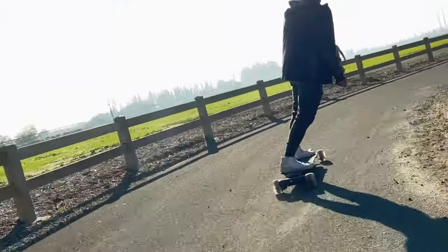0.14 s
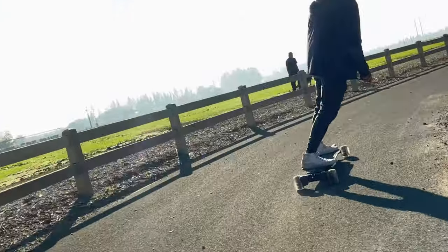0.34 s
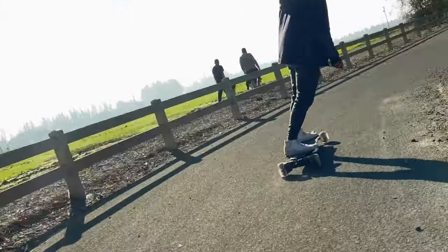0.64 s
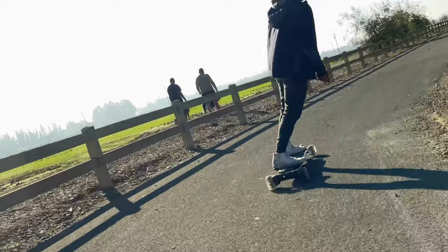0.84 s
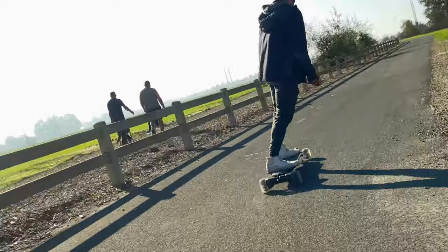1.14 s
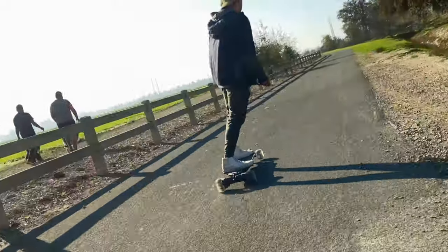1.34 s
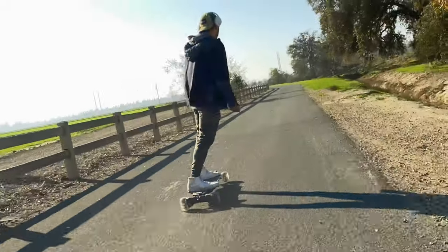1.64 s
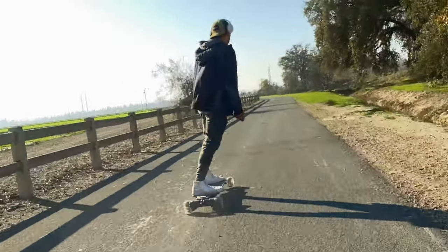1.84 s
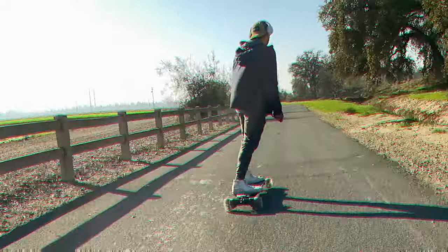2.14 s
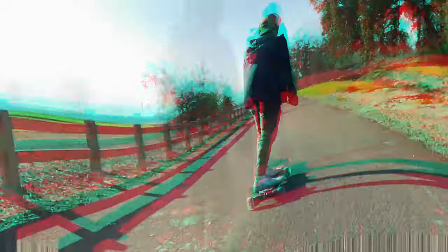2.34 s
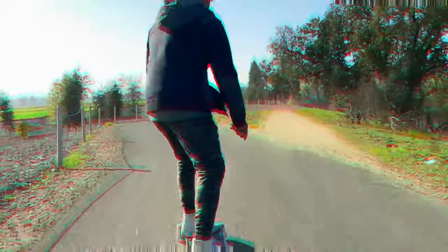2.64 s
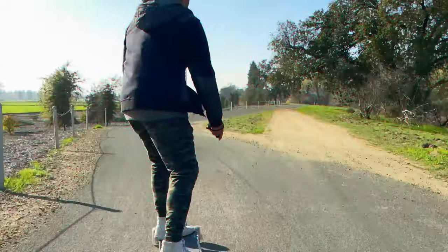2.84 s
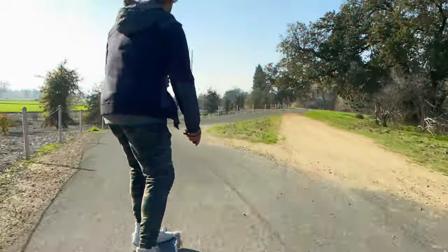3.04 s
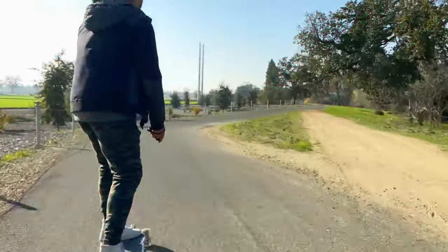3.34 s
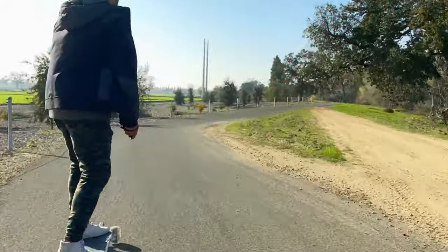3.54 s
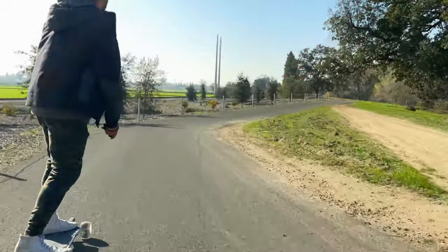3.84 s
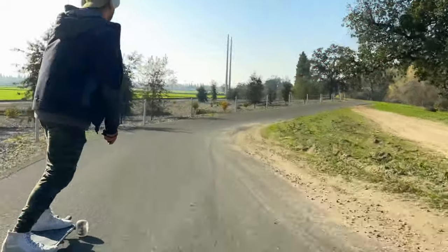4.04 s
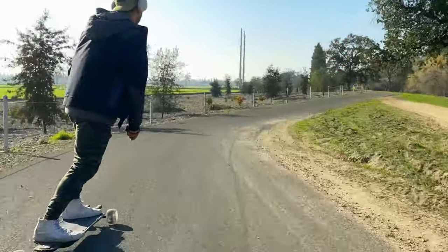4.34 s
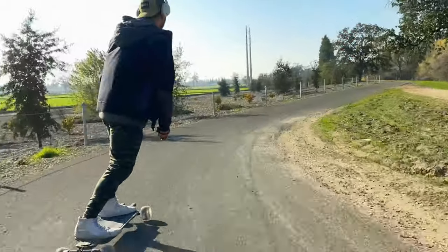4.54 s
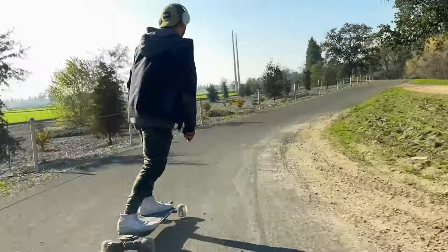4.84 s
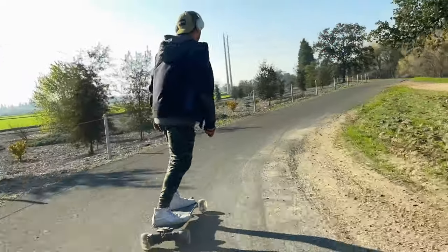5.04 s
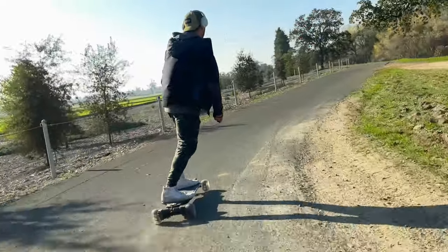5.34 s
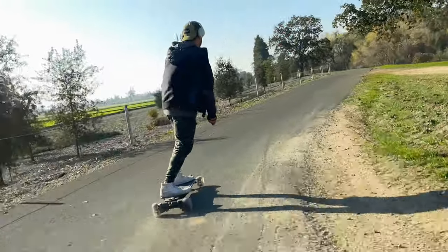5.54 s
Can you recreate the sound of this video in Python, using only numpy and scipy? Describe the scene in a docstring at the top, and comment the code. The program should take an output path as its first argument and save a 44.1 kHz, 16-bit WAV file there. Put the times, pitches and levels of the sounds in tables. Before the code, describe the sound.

A microphone follows an electric skateboard along a paved outdoor path, picking up rough wheel noise and low, gusty wind. Little stones click against the board and the wheels knock over bumps. The sound dips out briefly before the middle, then returns nearer, with stronger wind thumps. Toward the end two high motor whines swell, drift apart in pitch and come together again over the rolling.

```python
"""Wheels roar on coarse asphalt as an electric skateboard carves along, followed by a microphone.
The rough surface drives the resonances of wheels and deck; flicked grit snaps and small bumps knock.
Two hub motors whine almost in unison and part in pitch in a bend, where the inner one slows.
Turbulent wind buffets the microphone into its limiter.
About two seconds in, the sound fades out and comes back from closer by."""
import sys
import numpy as np
from scipy import signal
from scipy.fft import rfft, irfft
from scipy.io import wavfile
from scipy.ndimage import uniform_filter1d, minimum_filter1d

SR = 44100
rng = np.random.default_rng(int(sys.argv[2]) if len(sys.argv) > 2 else 0)


def put_to_file(sound):
    """Save the sound as 16-bit audio at rate SR, in the file named by the first command-line argument."""
    columns = np.atleast_2d(sound).T  # one column per channel
    safe = np.clip(columns, -1, 1)
    whole_steps = np.round(safe * 32767)
    wavfile.write(sys.argv[1], SR, whole_steps.astype(np.int16))


N = 250929
TIME = np.arange(N) / SR
FADE_START_S, SILENCE_S, FADE_END_S = 1.755, 2.163, 2.37   # far before the silence, near after it


# Spectra of the roar, far and near, and of the hiss. Each row: frequency in Hz, level in dB.
FAR_ROAR_SPECTRUM = [(100, 0), (270, -3.5), (350, -5), (720, -11), (1250, -7), (2100, -6.5), (2800, -9.5),
                     (4000, -11.5), (7000, -43)]
NEAR_ROAR_SPECTRUM = [(100, 0), (270, -4.5), (350, -3), (700, -8), (1020, -8.5), (1250, -2), (1900, -4.5),
                      (2300, -9), (3000, -12), (4000, -17), (7000, -33)]
HISS_SPECTRUM = [(1000, -18), (2500, 4.5), (3500, -2.5), (4400, 1), (5400, 6.5), (6800, 1.5)]
# Resonances of wheels and deck. Each row: frequency in Hz, width in Hz, far lift in dB, near lift in dB.
BOARD_RESONANCES = [(477, 200, 15, 8), (894, 470, 9, 5.5), (1600, 680, 9, 2)]
# Course of the rolling noise. Each row: time in seconds, relative levels of roar and of hiss in dB.
ROLLING_LEVELS = [(0.3, -43, -52.5), (1.0, -43, -51), (1.7, -41, -51), (2.45, -48, -53), (2.6, -41.5, -43),
                  (3.0, -40.5, -46.5), (3.42, -40, -51), (4.44, -39.5, -47.5), (4.72, -45, -51.5),
                  (5.1, -41.5, -46.5), (5.69, -40, -48)]

def tyres(far_db=2.0, near_db=4.5, hiss_db=-2.5, flutter_db=1.12, crackle=0.96):
    """Roughness excitation: asphalt stones drum on wheels and deck; fine grit hisses under the tread."""
    roar_level, hiss_level = in_time(ROLLING_LEVELS)
    road = rng.standard_normal(N) + grains(per_s=2500, spread_db=0.5)
    far_modes = [(hz, width, db) for hz, width, db, _ in BOARD_RESONANCES]
    near_modes = [(hz, width, db) for hz, width, _, db in BOARD_RESONANCES]
    far = from_db(far_db) * coloured(road, FAR_ROAR_SPECTRUM, far_modes)
    near = from_db(near_db) * coloured(road, NEAR_ROAR_SPECTRUM, near_modes)
    roar = from_db(roar_level) * np.where(TIME < SILENCE_S, far, near)
    fine_grit = rng.standard_normal(N) + crackle * grains(per_s=460, spread_db=3.0)
    hiss = coloured(fine_grit, HISS_SPECTRUM) * fade() ** 0.11   # the sound dulls as it fades
    surface = from_db(flutter_db * drift(34))   # coarse and smooth patches pass under the wheels
    return surface * (roar + from_db(hiss_level + hiss_db) * hiss)


# Rasping upper partials. Each row: harmonic number, level in dB against the mean of whine and octave.
RASP_PARTIALS = [(3, -15.5), (4, -11.5), (5, -13.5)]

def motor(course, wobble=0.0013, throb_db=1.0, hum_db=-10.0, smear_db=-7.0):
    """Random modulation: the road shakes speed and load, smearing a motor's partials into noise."""
    hz, whine_db, octave_db = in_time(course)
    phase = 2 * np.pi * np.cumsum(hz * (1 + wobble * drift(12))) / SR
    hum = from_db(hum_db) * np.sin(phase / 7)
    whine = np.sin(phase) + from_db(smear_db) * noise_band(phase, 100)
    lean = np.interp(TIME, [3.836, 4.38, 6.75], [0, 1, 0])   # start, apex and end of the bend
    noise_share = 0.18 + 0.55 * lean   # leaning roughens the octave
    octave = np.sqrt(1 - noise_share) * np.sin(2 * phase)
    octave += np.sqrt(noise_share) * noise_band(2 * phase, 110)
    mean_db = (whine_db + octave_db) / 2
    rasp = sum(from_db(mean_db + db) * noise_band(k * phase, 190) for k, db in RASP_PARTIALS)
    throb = from_db(throb_db * drift(36))
    return throb * (from_db(whine_db) * (hum + whine) + from_db(octave_db) * octave + rasp)


# Courses of the two motors. Each row: time in seconds, pitch in Hz, whine in dB, octave in dB.
OUTER_MOTOR = [(0, 1245, -70, -61), (0.3, 1222, -62.5, -52.5), (1.3, 1251, -69.5, -63.5),
               (2.8, 1192, -53.5, -55), (3.3, 1170, -59, -45), (3.62, 1163, -57.5, -41.5),
               (3.87, 1166, -58, -48.5), (4.09, 1174, -54, -43), (4.16, 1163, -45, -43),
               (4.27, 1193, -41.5, -43), (4.33, 1214, -36.5, -43.5), (4.46, 1215, -34.5, -40),
               (4.58, 1199, -38.5, -40.5), (4.65, 1198, -47, -53.5), (4.73, 1210, -39, -44),
               (4.9, 1235, -40, -45.5), (4.98, 1256, -45.5, -44), (5.11, 1260, -41, -44.5),
               (5.23, 1261, -44.5, -46), (5.36, 1293, -51, -46.5), (5.69, 1302, -50, -49.5)]
INNER_MOTOR = [(3.1, 1160, -68, -61), (3.33, 1155, -62, -48), (3.55, 1159, -54, -56),
               (3.85, 1205, -46.5, -57), (4.03, 1209, -48, -64), (4.15, 1199, -40.5, -65),
               (4.31, 1173, -47.5, -44), (4.47, 1131, -43.5, -58), (4.63, 1116, -50, -63),
               (4.9, 1189, -48, -58), (5.69, 1292, -61, -47)]

def hub_motors():
    """Pitch follows rotation speed: two whines part as the motor on the inside of the bend slows."""
    return motor(OUTER_MOTOR) + motor(INNER_MOTOR)


# Stones flicked against the board. Each row: start in seconds, peak in dB, brightness in Hz.
GRIT_STRIKES = [(0.159, -11, 7100), (0.373, -22.5, 4730), (0.378, -20.5, 5600), (0.7105, -30.5, 3980),
                (0.835, -33, 3000), (1.004, -30, 5050), (1.347, -28.5, 3700), (1.436, -30, 5520),
                (1.6851, -31, 4340), (1.966, -38.5, 5470), (2.116, -26, 4740), (2.7298, -19.5, 2460),
                (3.011, -27.5, 5000), (3.179, -26, 6300), (4.654, -22.5, 6200), (4.6595, -32, 5900),
                (4.872, -28, 4520), (5.505, -27, 4860)]

def grit(snap_db=7.0, scratch_t60_s=0.0082):
    """A brief impact has a broad spectrum: each small stone snaps, then scratches for an instant."""
    out, t = np.zeros(N), np.arange(SR // 40) / SR
    decay = np.exp(-np.log(1000) * t / scratch_t60_s)
    for start, db, hz in GRIT_STRIKES:
        contact = from_db(snap_db) * (t == 0) + rng.standard_normal(len(t)) * decay
        band = signal.butter(2, [0.7 * hz, min(1.7 * hz, 7300)], "band", fs=SR, output="sos")
        snap = signal.sosfilt(band, contact)
        add(out, start, from_db(db) * snap / np.abs(snap).max())
    return out


# Wheels hitting bumps. Each row: start in seconds, peak in dB, lower and upper roll-off in Hz.
BUMP_KNOCKS = [(0.469, -22, 352, 550), (0.4737, -16.5, 400, 1050), (0.6404, -20.5, 1290, 2000),
               (0.67, -26, 1200, 1600), (0.7775, -24.5, 400, 650), (1.164, -26.5, 1300, 2600),
               (1.225, -24, 1500, 2800), (2.73, -15.5, 450, 2800), (3.4492, -18.5, 493, 900),
               (4.61, -22, 400, 1300), (5.556, -21.5, 400.5, 2000)]
# Modes of the knocked board. Each row: frequency in Hz, relative level in dB, 60 dB decay in seconds.
STRUCK_MODES = [(484, -0.5, 0.023), (650, -11, 0.037), (900, 0.5, 0.01), (1290, 5.5, 0.0087),
                (1600, 3, 0.006), (2130, 0, 0.0046), (2800, 0, 0.0065), (5600, -7, 0.006)]

def bumps(uneven_db=2.5, contact_s=0.0004):
    """Modal ringing: each knock sets the board's damped modes vibrating freely."""
    out, t = np.zeros(N), np.arange(SR // 10) / SR
    hz, mode_db, t60 = np.array(STRUCK_MODES).T[:, :, None]
    rings = np.sin(2 * np.pi * hz * t) * np.exp(-np.log(1000) * t / t60)
    attack = 1 - np.exp(-t / contact_s)   # rounded by the tyre
    for start, db, low_hz, bright_hz in BUMP_KNOCKS:
        strength = from_db(mode_db + uneven_db * rng.standard_normal(hz.shape))
        strength /= 1 + (hz / bright_hz) ** 3   # a soft contact weakens the high modes
        strength /= 1 + (low_hz / hz) ** 3   # a light one weakens the low modes
        knock = attack * np.sum(rng.choice([-1, 1], hz.shape) * strength * rings, axis=0)
        add(out, start, from_db(db) * knock / np.abs(knock).max())
    return out


# Gusts on the microphone. Each row: start in seconds, length in seconds, relative level in dB.
WIND_GUSTS = [(0.257, 0.032, -37.5), (0.507, 0.016, -33), (0.644, 0.019, -33.5), (1.493, 0.071, -31),
              (1.735, .11, -34.5), (2.035, 0.082, -51), (2.235, 0.12, -39), (2.387, 0.074, -31.5),
              (2.511, 0.1, -27.5), (2.655, 0.14, -30), (2.924, 0.018, -30.5), (3.07, 0.078, -32),
              (3.397, 0.048, -23), (3.891, 0.049, -32), (4.138, 0.016, -43), (4.615, 0.044, -28),
              (4.741, 0.013, -36), (4.81, 0.015, -36), (4.936, 0.071, -30.5), (5.229, 0.12, -30.5),
              (5.588, 0.083, -32.5)]
# Spectra of the wind's rumble and flapping. Each row: frequency in Hz, level in dB.
RUMBLE_SPECTRUM = [(15, -20), (30, -16.5), (50, 7), (76, 2), (115, -8), (200, -17.5), (350, -33.5),
                   (700, -42.5), (2000, -76.5)]
FLAP_SPECTRUM = [(50, -17), (120, 0.5), (190, -4.5), (300, -10.5), (600, -14.5), (1000, -23), (1600, -37.5),
                 (4000, -63)]

def wind(far_db=-45.5, near_db=-41, swing_db=2.5, rumble_db=3.0, flap_db=-13.5, strong_db=-21.0):
    """Turbulent pressure: headwind and gusts add in power, rumbling and flapping on the microphone."""
    breeze = fade() * from_db(np.where(TIME < SILENCE_S, far_db, near_db) + swing_db * drift(9.6))
    gust_power = sum((from_db(db) * swell(start, length, attack_s=0.01, release_s=0.019)) ** 2
                     for start, length, db in WIND_GUSTS)
    flow_db = 10 * np.log10(breeze ** 2 + gust_power + 1e-12)
    rumble = coloured(rng.standard_normal(N), RUMBLE_SPECTRUM)
    rumble /= np.sqrt(uniform_filter1d(rumble ** 2, size=SR // 24) + 1e-9)   # even flow between gusts
    flap = coloured(rng.standard_normal(N), FLAP_SPECTRUM)
    flap_level = strong_db + flap_db + 0.95 * (flow_db - strong_db) + 0.89 * drift(35)
    return from_db(flow_db + rumble_db) * rumble + from_db(flap_level) * flap


# Eddies slapping the microphone. Each row: time in seconds, relative level in dB,
# tearing frequency of the core in Hz, approach in seconds, length of the thud in seconds.
EDDY_SLAPS = [(0.231, -19.5, 302, 0.004, 0.018), (0.537, -20, 192, 0.012, .005),
              (1.171, -22.5, 335, 0.0085, 0.0094), (1.186, -21.5, 420, 0.007, 0.014),
              (1.221, -20.5, 127, 0.012, 0.019), (2.221, -33, 746, 0.0012, .008),
              (2.246, -30, 770, .002, 0.013), (2.274, -27, 480, .005, 0.0063),
              (2.35, -21, 685, 0.00232, 0.0079), (2.433, -26, 380, 0.0062, .008),
              (2.467, -24, 530, 0.0048, 0.0073), (2.489, -14.5, 830, 0.0011, 0.014),
              (2.548, -21, 523, 0.0081, 0.012), (2.646, -11.5, 780, 0.00084, 0.024),
              (2.7, -14, 1120, 0.0036, 0.0091), (2.709, -13.5, 480, 0.0023, .013),
              (2.733, -12, 1290, 0.0022, 0.0063), (2.769, -17, 446, 0.0016, .006),
              (2.779, -14.5, 907, 0.004, .012), (3.028, -17, 450, 0.003, 0.0049),
              (3.049, -16.5, 426, 0.0059, 0.028), (3.121, -22.5, 260, 0.013, 0.02),
              (3.392, -27, 400, 0.0059, 0.008), (3.407, -25, 231, 0.0042, 0.0069),
              (3.424, -18, 622, 0.006, 0.023), (4.597, -17.5, 473, 0.0051, 0.0067),
              (4.61, -10, 800, 0.0037, 0.017), (4.637, -18.5, 380, 0.0031, 0.0041),
              (4.65, -19, 524, 0.0047, 0.018), (4.798, -21, 450, 0.0037, 0.0048),
              (4.806, -17.5, 560, 0.0027, 0.023), (4.921, -20.5, 238, 0.004, 0.016),
              (4.948, -31, 230, 0.0077, .006), (4.969, -20.5, 350, 0.0053, 0.0094),
              (4.987, -31, 340, 0.0044, .01), (5.01, -14.5, 779, 0.006, 0.0089),
              (5.022, -18.5, 298, 0.0025, 0.013), (5.228, -21, 380, 0.0039, 0.0054),
              (5.241, -21, 606, 0.0027, .018), (5.273, -18.5, 446, 0.0047, 0.015),
              (5.305, -18.5, 510, 0.0035, 0.0094), (5.321, -18, 495, 0.0034, 0.0078),
              (5.344, -25, 517, 0.0018, 0.02), (5.581, -15.5, 377, 0.0058, 0.007),
              (5.644, -11.5, 480, 0.0017, 0.0035), (5.652, -13, 468, 0.0017, 0.012),
              (5.666, -19.5, 380, 0.0027, .012)]

def eddies(thud_hz=66.9, fall_s=0.0053, ragged=0.366, lumpy_db=2.0, tear_db=-12.5, tear_s=0.0044):
    """A passing vortex: pressure flutters faster as it nears, tears at the core, then slows to a thud."""
    out, lead = np.zeros(N), SR // 16
    t = np.arange(-lead, 2 * lead) / SR
    before, after = np.maximum(-t, 0), np.maximum(t, 0)
    for arrival, db, core_hz, approach, length in EDDY_SLAPS:
        jitter, lumps = rms_one(uniform_filter1d(rng.standard_normal((2, len(t))), size=SR // 400))
        nearness = np.exp(-before / approach - after / fall_s)
        hz = (thud_hz + (0.6814 * core_hz - thud_hz) * nearness) * np.exp(ragged * jitter)
        flutter = np.sin(2 * np.pi * (np.cumsum(hz) / SR + rng.random()))
        flutter *= (thud_hz / hz) ** 0.32   # faster swings are weaker
        unevenness = from_db(lumpy_db * uniform_filter1d(lumps, size=SR // 600))
        thud = flutter * unevenness * np.exp(-(before / approach + after / length) ** 2 / 2)
        band = signal.butter(2, [0.4 * core_hz, 1.3 * core_hz], "band", fs=SR, output="sos")
        tear = rms_one(signal.sosfilt(band, rng.standard_normal(len(t))))
        tear *= np.exp(-before / approach - after / tear_s)
        add(out, arrival - lead / SR, from_db(db - 0.94) * (thud + from_db(tear_db) * tear))
    return out


# Hum of the wheels. Each row: time in seconds, fundamental in Hz, level of the third harmonic in dB.
DRONE_COURSE = [(0.7, 274.5, -55), (0.88, 277, -51.5), (1.03, 275, -56), (1.12, 276, -56.5),
                (1.35, 288, -45), (1.55, 297, -45.5), (1.78, 296, -48), (2.05, 300, -44), (2.5, 300, -62)]

def wheel_drone(fundamental_db=-2.0, waver=0.008, smear_hz=26):
    """Periodic excitation: spinning wheels hum a slowly rising note; the road blurs its third harmonic."""
    hz, level_db = in_time(DRONE_COURSE)
    phase = 2 * np.pi * np.cumsum(hz * (1 + waver * drift(46))) / SR
    third = noise_band(3 * phase, smear_hz)
    return from_db(level_db) * (from_db(fundamental_db) * np.sin(phase) + third)


# Ring of the tyres. Each row: time in seconds, frequency in Hz, level in dB.
RING_COURSE = [(0.1, 1416, -60), (0.6, 1568, -51), (1.15, 1693, -42), (1.7, 1666, -49.5), (2.6, 1734, -53)]
# Spectrum of crushed grains. Each row: frequency in Hz, level in dB.
TICK_SPECTRUM = [(1000, -13), (2200, -3.5), (3500, -0.5), (6800, -8.5)]

def tread(ring_width_hz=110, throb_db=1.0, ticks_db=-58.0):
    """Resonance: the tyres ring in a narrow, shifting band, while the grains they crush tick crisply."""
    hz, level_db = in_time(RING_COURSE)
    phase = 2 * np.pi * np.cumsum(hz) / SR
    ring = from_db(level_db + throb_db * drift(16)) * noise_band(phase, ring_width_hz)
    ticks = coloured(grains(per_s=45, spread_db=4.5), TICK_SPECTRUM)
    return ring + from_db(ticks_db) * ticks


# Tyres scuffing over loose sand. Each row: start in seconds, length in seconds, level in dB.
SAND_SCUFFS = [(0.321, 0.0092, -50), (0.399, 0.018, -41.5)]
# Spectrum of the scuffs. Each row: frequency in Hz, level in dB.
SCUFF_SPECTRUM = [(1200, -19), (3000, 1), (4500, -2), (6800, -11.5)]

def scuffs(attack_s=0.003, release_s=0.0046):
    """Granular friction: sand grinds under a tyre in a short, dense crackle."""
    level = sum(from_db(db) * swell(start, length, attack_s, release_s)
                for start, length, db in SAND_SCUFFS)
    return level * coloured(grains(per_s=5000, spread_db=1.5), SCUFF_SPECTRUM)


def from_db(db):
    """Decibels to amplitude gain."""
    return 10 ** (np.asarray(db) / 20)


def rms_one(x):
    """Normalisation to unit power."""
    return x / np.sqrt(np.mean(x ** 2) + 1e-20)


def in_time(rows):
    """Linear interpolation of a table's columns at every sample; the first column is time."""
    times, *columns = np.transpose(rows)
    return [np.interp(TIME, times, column) for column in columns]


def drift(rate_hz):
    """Low-passed noise: a slow random fluctuation of unit spread."""
    step, settle = 40, 2000
    pole = np.exp(-2 * np.pi * rate_hz * step / SR)
    noise = rng.standard_normal(N // step + settle + 2)
    slow = signal.lfilter([1], [1, -2 * pole, pole * pole], noise)[settle:]
    return np.interp(np.arange(N) / step, np.arange(len(slow)), rms_one(slow))


def noise_band(phase, width_hz):
    """Quadrature modulation: narrow-band noise around a moving tone, as strong as a unit sine."""
    return (drift(width_hz) * np.sin(phase) + drift(width_hz) * np.cos(phase)) / np.sqrt(2)


def coloured(x, spectrum, modes=()):
    """Spectral shaping below SR / 6, lifted at resonances (Hz, width in Hz, dB); unit power."""
    hz = np.maximum(np.arange(N // 2 + 1) * SR / N, 1)
    points_hz, points_db = np.transpose(spectrum)
    db = np.interp(np.log(hz), np.log(points_hz), points_db)
    for centre, width, lift in modes:
        db += lift / (1 + (2 * (hz - centre) / width) ** 2)
    return rms_one(irfft(rfft(x) * from_db(db) * (hz < SR / 6), N))


def grains(per_s, spread_db):
    """Shot noise: random clicks of uneven size; unit power."""
    sizes = from_db(spread_db * np.minimum(rng.exponential(1, N), 4))
    return rms_one(sizes * rng.choice([-1, 1], N) * (rng.random(N) < per_s / SR))


def swell(start, length, attack_s, release_s):
    """An exponential envelope that reaches 1 at the start, holds, and dies away."""
    early, late = np.maximum(start - TIME, 0), np.maximum(TIME - start - length, 0)
    return np.exp(-np.minimum(early / attack_s + late / release_s, 20))


def fade():
    """A linear envelope that sinks to silence and swells back."""
    return np.interp(TIME, [FADE_START_S, SILENCE_S, FADE_END_S], [1, 0, 1])


def add(out, start_s, sound):
    """Mix a short sound in at its start time."""
    start = int(start_s * SR)
    out[start:start + len(sound)] += sound[:N - start]


def scene():
    """Superposition: the rolling board, fading out and returning closer, under the wind."""
    board = tyres() + tread() + hub_motors() + wheel_drone() + grit() + scuffs() + bumps()
    gap = np.minimum(np.abs(TIME - SILENCE_S) / 0.021, 1)   # the wind too falls silent for an instant
    return (fade() * board + gap * (wind() + eddies()))[None]


def record(dry, ceiling=0.195, release_db_per_s=500, cutoff_hz=6880):
    """Peak limiting: a fast drop in gain holds the gusts down; a steep low-pass removes the top."""
    over_db = 20 * np.log10(np.maximum(np.abs(dry[0]) / ceiling, 1))
    held_db = -minimum_filter1d(-over_db, size=SR // 1000)
    release_ramp = release_db_per_s * TIME
    reduction_db = np.maximum.accumulate(held_db + release_ramp) - release_ramp
    limited = dry * from_db(-uniform_filter1d(reduction_db, size=SR // 1000))
    low_pass = signal.ellip(9, 0.2, 70, cutoff_hz, fs=SR, output="sos")
    return signal.sosfilt(low_pass, limited)


dry = scene()
out = record(dry)
put_to_file(out)
```